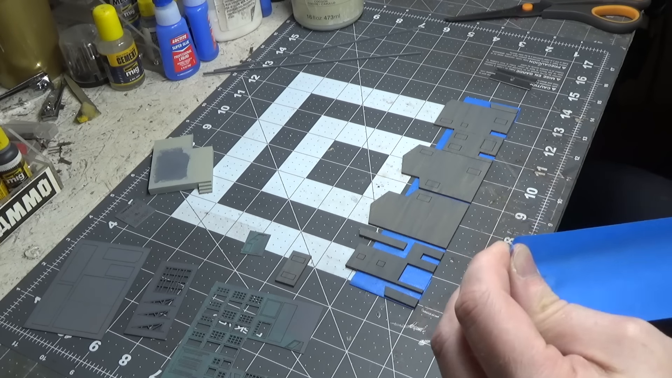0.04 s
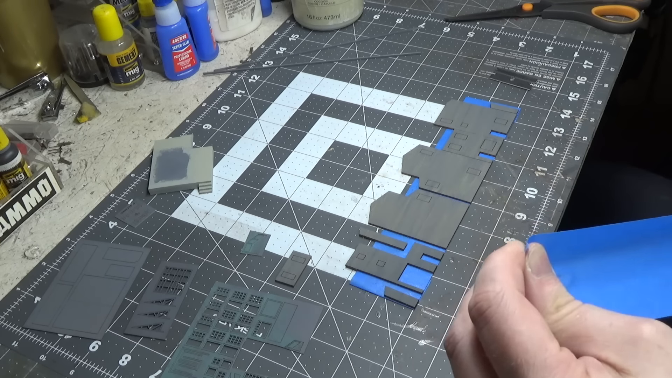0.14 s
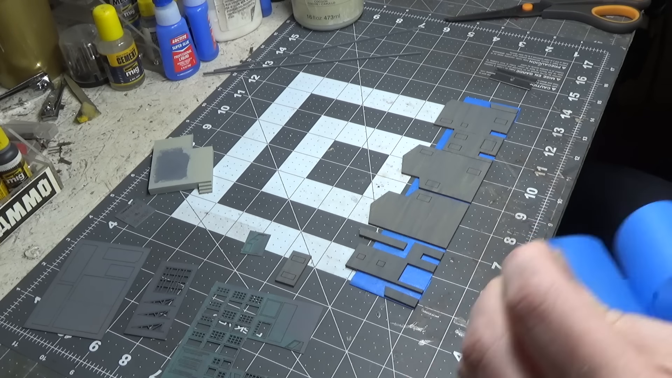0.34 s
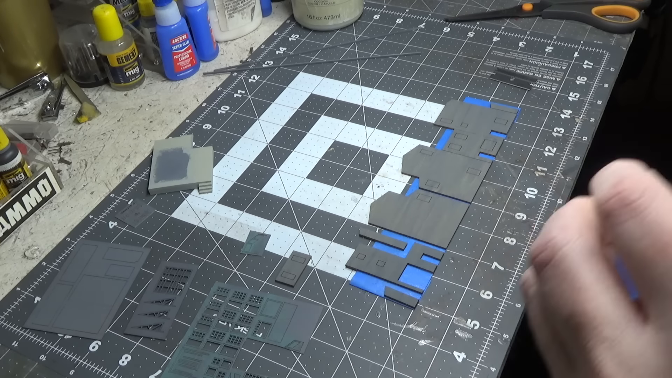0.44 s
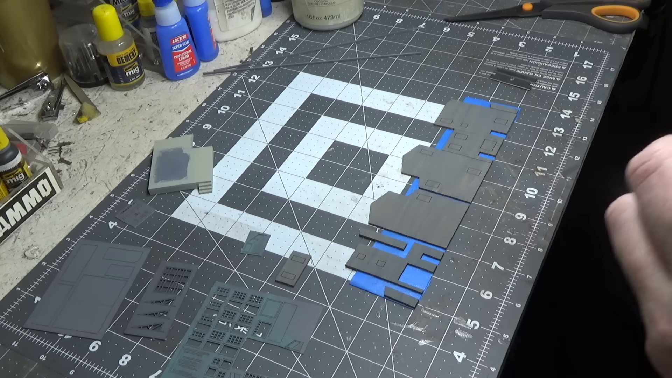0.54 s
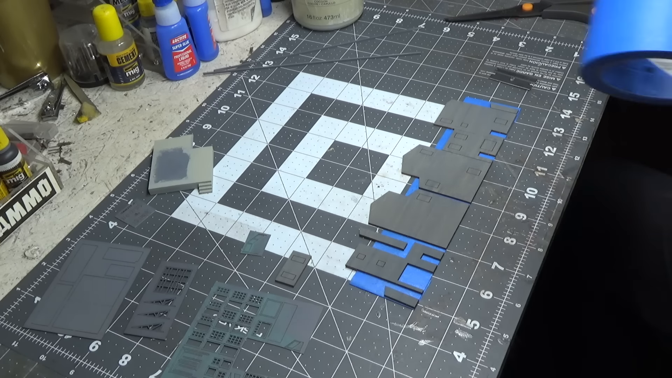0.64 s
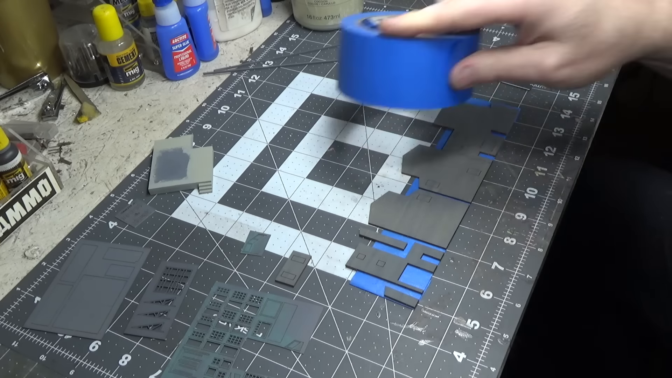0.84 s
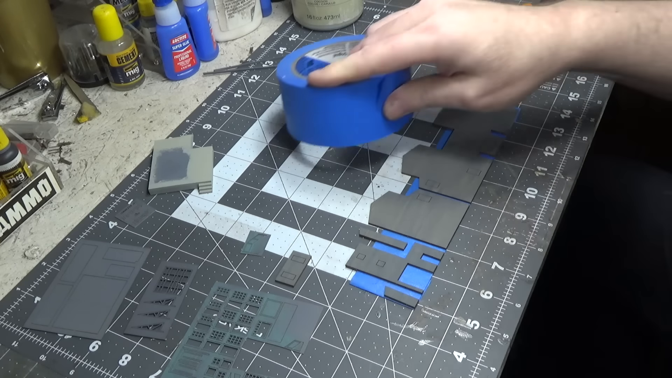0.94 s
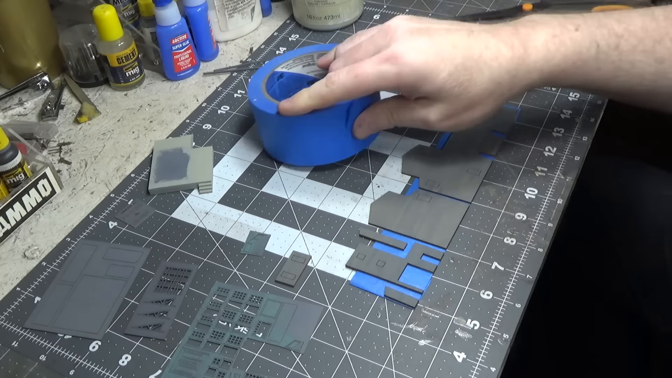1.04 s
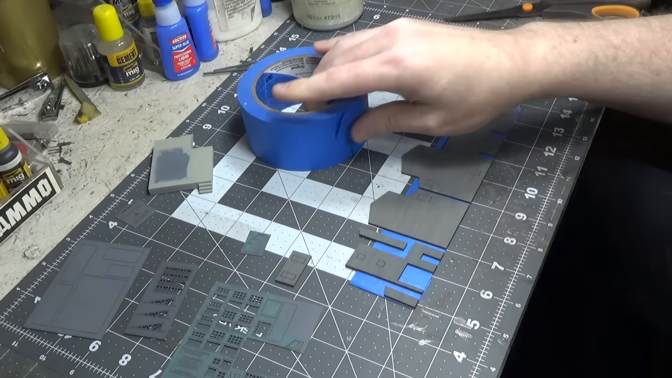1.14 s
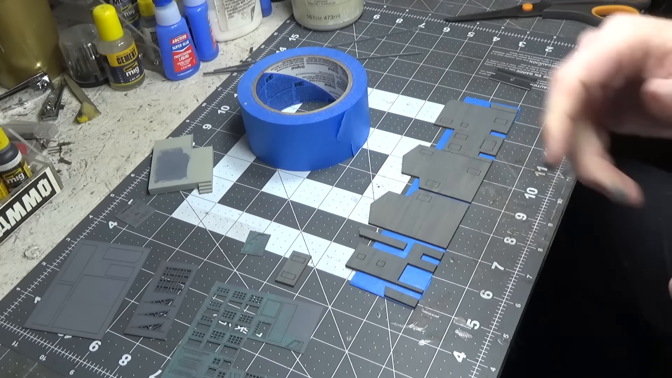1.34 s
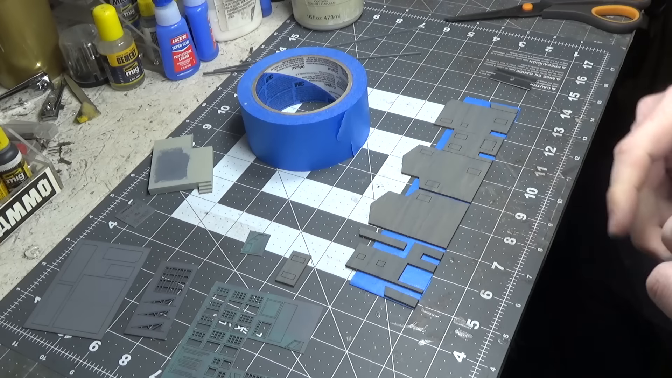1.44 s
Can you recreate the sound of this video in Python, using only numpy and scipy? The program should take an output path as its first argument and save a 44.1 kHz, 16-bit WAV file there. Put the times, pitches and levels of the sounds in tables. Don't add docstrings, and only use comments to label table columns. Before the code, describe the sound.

Masking tape tears off its roll in harsh quick jerks, then the roll thuds on a desk

```python
import sys
import numpy as np
from scipy import signal
from scipy.fft import rfft, irfft
from scipy.io import wavfile
from scipy.ndimage import uniform_filter1d

SR = 44100
rng = np.random.default_rng(int(sys.argv[2]) if len(sys.argv) > 2 else 0)


def invert_db(level):
    return 10 ** (np.asarray(level, dtype=float) / 20)


def master(y):
    cut = np.clip(np.atleast_2d(y).T, -1, 1)
    pcm = np.round(cut * 32767)
    wavfile.write(sys.argv[1], SR, pcm.astype(np.int16))


N = 66150
TIME_S = np.arange(N) / SR

# (frequency [Hz], density [dB per Hz])
HUSH_SPECTRUM = [(20, -18), (60, 4), (100, -5.5), (250, -3), (1000, -14), (2000, -19), (3200, -18),
                 (4200, -21.5), (16000, -27.5)]
HUSH_DB = -61

# (time [s], length [s], first level [dB], last level [dB], tilt [dB per octave])
RUBS = [ (0, .006, -56, -59, -2), (.012, .005, -56, -48, -14), (.0175, .016, -37, -49, -12),
        (.04, .01, -49, -55, -13), (.067, .008, -54, -60, -14), (.4835, .031, -41, -43, 0),
        (.425, .055, -53, -57, -3), (0.514, 0.04, -46.5, -33, 2), (.552, 0.0071, -31, -39.5, -3),
        (.56, 0.036, -55, -51, -1.5), (.597, .009, -50, -47, 1), (.606, .04, -44, -44.5, 1),
        (.646, .044, -45, -48, 0), (.692, .018, -51, -58, -2), (.712, .016, -59, -52, -1),
        (.729, .031, -49, -53, -1), (.411, .012, -40, -48, 3), (0.784, 0.086, -61, -57, -1),
        (0.875, .09, -65, -54.5, -3), (1.093, 0.027, -50, -51, -7), (1.081, 0.11, -56.5, -57, -15.5),
        (1.15, .03, -59.5, -56, -1.5), (1.198, .1, -41, -62.5, -17.5), (1.203, 0.017, -55, -53, 15),
        (.4062, .006, -34, -43, -4)]
# (frequency [Hz], density [dB per Hz])
SKIN_SPECTRUM = [(500, -19), (800, -13.5), (1300, -16.5), (2000, -7), (3000, -2), (6000, -5.5),
                 (10000, -10), (16000, -17)]
RUB_SLIPS_PER_S, RUB_SPREAD_DB, RUB_PATCH_DB = 25000, 1.5, 1
RUB_RISE_S, RUB_RELEASE_T60_S = 0.002, 0.015

# (time [s], level [dB],
# frequency [Hz], t60 [s])
JOLTS = [(0.0177, -57.5, 241.5, 0.21), (0.0183, -31, 456, 0.028), (0.039, -42, 664, 0.024),
         (0.067, -42.5, 384, 0.037), (0.07, -53.5, 69, 0.13), (0.22, -21, 97, 0.13),
         (0.2299, -12.5, 140, 0.073), (0.236, -16, 83, 0.077), (.236, -16, 447.3, 0.062),
         (.236, -11, 226, 0.018), (.253, -42, 600, 0.02), (0.328, -36.5, 328, 0.012),
         (.364, -24.5, 950, 0.008), (0.36, -45, 48, 0.1), (0.407, -50.5, 236, 0.1), (0.414, -47, 38, 0.25),
         (1.095, -50, 537, 0.16), (1.1, -53, 765, 0.12), (.012, -52, 397, 0.035),
         (1.0393, -24, 336, 0.0059), (1.174, -33, 257.6, 0.015), (1.251, -54, 74.5, 1.32),
         (1.258, -58, 138, 0.97), (.0172, -38.5, 4690, 0.022), (.0172, -46.5, 6260, .01),
         (.024, -54, 5200, 0.037), (.0205, -38.5, 3507, .015), (.0215, -39, 283, 0.034),
         (.0413, -40, 648.5, .012), (1.0405, -24, 2430, 0.01), (1.0407, -32.5, 3260, 0.021),
         (1.177, -28, 1220, 0.024), (1.195, -29.5, 200.3, .1)]

# (time [s], peak [dB], centre [Hz], width [Hz])
TICKS = [(0.0175, -35.5, 2780, 1800), (.041, -39, 700, 870), (.068, -40.5, 700, 890),
         (.329, -28, 3100, 1200), (.3641, -31, 2900, 1500), (.0172, -36, 5030, 1800),
         (0.0199, -35, 1340, 1013), (.691, -49, 8400, 5000), (.729, -43, 9400, 2000),
         (.7605, -54, 11000, 2990), (1.1865, -26, 3030, 1195), (1.0931, -43, 2525, 900),
         (.4068, -27, 2900, 2000), (.4097, -22, 9000, 7000), (0.419, -40, 2800, 1500),
         (.5555, -29, 2930, 900), (.691, -40, 700, 1000), (.728, -32.5, 1860, 2070), (.7515, -38, 560, 700),
         (0.7892, -44.5, 8100, 9000), (.907, -52, 2100, 400), (0.9077, -46, 9186, 3870),
         (0.929, -40, 8880, 5000), (0.9563, -36, 7350, 5910), (1.033, -56, 9850, 2910),
         (1.0415, -33, 2668, 900), (1.285, -55, 8990, 2986), (1.307, -51, 7050, 3020),
         (1.355, -54.5, 8980, 2940), (.2317, -8, 8400, 1300), (.2334, -10, 5300, 1400),
         (.2356, -11, 3200, 1500), (0.2233, -13, 2730, 1500), (0.2516, -3, 8970, 2500),
         (.812, -58, 9300, 2000), (0.843, -56, 9460, 1980), (.87, -49, 9000, 2980),
         (.4085, -29, 2450, 1400)]
TICK_T60_S, TICK_RISE_S = 0.0066, 0.000043

# (time [s], level [dB], push +1 or pull -1)
TAPS = [
    (.0179, -19.5, -1),
    (.3281, -15.5, -1),
    (.3639, -13, 1),
]

# (time [s], rise [s], hold [s], level [dB], tilt [dB per octave])
JERKS = [(0.185, .004, 0.013, -50, -3), (0.203, 0.0033, 0.0025, -41, -3), (0.214, 0.0006, .003, -31, -3),
         (.2170, .0006, 0.00076, -16, 0), (0.2180, .0005, 0.001, -8, -1.5),
         (0.219, 0.0025, 0.011, -15, -1.5), (.2295, .002, .001, -14, -2), (.2312, .001, .0013, -14, 2),
         (.2335, .0008, .002, -15, 0), (.2358, .0006, .0012, -16, -2), (0.239, 0.00091, 0.0044, -18, -5.5),
         (.2514, .0007, .0016, -3, 6), (.2541, .0008, .0014, -4, -1), (0.257, .002, 0.0036, -26, -2),
         (0.267, 0.00026, 0.0008, -15.5, -6)]
# (frequency [Hz], density [dB per Hz])
TEAR_SPECTRUM = [(150, -20.5), (400, -9), (1000, -5), (1500, -10.5), (3000, -2.5), (6000, -5.5),
                 (9500, -13), (11500, -17), (16000, -27)]
TEAR_FIBRES_PER_S, TEAR_SPREAD_DB, JERK_T60_S = 25000, 2, 0.0082

# (time [s], length [s], level [dB], frequency [Hz])
SQUEAKS = [
    (.645, .035, -57, 1850),
    (.79, .13, -70, 2090),
    (.897, .02, -62, 1790),
]
SQUEAK_WIDTH_HZ = 250

# (time [s], desk level [dB], crack level [dB], sway level [dB])
LANDINGS = [
    (1.039, -28, -32, -38.5),
    (1.1755, -14, -12, -30),
]
# (frequency [Hz], edge-first level [dB], flat level [dB], t60 [s])
DESK_MODES = [(60.5, -6, -36, 0.029), (90.8, 0.5, -0.5, 0.073), (140, -5.5, -3.5, 0.13),
              (177.6, -27, -3.5, 0.091), (286.7, -11.5, -8.5, 0.076), (407, -15.5, 5.5, 0.029),
              (501, -23.5, -18, 0.18), (566, -23, -21, 0.15), (700, 2, -43, 0.019),
              (912, -17, -10.5, 0.039), (1092, -6, -4.5, 0.016), (1500, -38, -13.5, 0.032)]
# (frequency [Hz], density [dB per Hz])
MAT_SPECTRUM = [(300, -23), (600, -8.5), (1300, -6.5), (1700, -7.5), (2300, -2.5), (3400, -3.5),
                (3900, -16), (16000, -41.5)]
DESK_LAG_S, LAND_RISE_S = 0.00167, 0.01
CRACK_T60_S, CRACK_TAIL_T60_S, CRACK_TAIL_DB = 0.017, 0.089, -14
SWAY_HZ, SWAY_T60_S, BEAT_HZ, BEAT_NULL_S = 38, 8.95, 6.6, 0.04

# (frequency [Hz], t60 [s])
WALLS = [(100, 0.61), (1000, 0.24), (3000, 0.51), (5600, 0.4), (7300, .26), (10000, 0.36), (12000, 0.2),
         (16000, 0.24)]
WALLS_DB, EARLY_DB = -23.5, -10.5
EARLY_SHARE = 0.32
DIFFUSE_HZ = 1200

# (frequency [Hz], gain [dB])
MIC_RESPONSE = [(2200, 0.5), (3300, 1.5), (4100, -4.5), (5400, 1.5), (6700, -1.5), (8600, 2.5), (10300, 0),
                (11200, -2)]
LOW_CUT_HZ, TOP_HZ = 24, 15900
OVERLOAD_PEAK, SPLATTER_DB = 0.94, -34


def unit(x):
    return x / np.sqrt(np.mean(x ** 2) + 1e-20)


def along(points, hz):
    f, v = np.transpose(points)
    return np.interp(np.log(hz + 1), np.log(f + 1), v)


def coloured(x, points, tilt_db=0):
    hz = np.fft.rfftfreq(2048, 1 / SR)
    level_db = along(points, hz) + tilt_db * np.log2((hz + 900) / 3900)
    cepstrum = irfft(np.log(invert_db(level_db) + 1e-6))
    cepstrum[1:1024] *= 2
    cepstrum[1025:] = 0
    h = irfft(np.exp(rfft(cepstrum)))
    return signal.fftconvolve(x, h / np.linalg.norm(h))[:len(x)]


def resonance(x, hz, width_hz):
    size = 2 * len(x)
    f = np.fft.rfftfreq(size, 1 / SR)
    damping = 1j * f * width_hz
    response = damping / (hz * hz - f * f + damping)
    return irfft(rfft(x, size) * response)[:len(x)]


def decay(t, t60):
    return (t >= 0) * invert_db(-60 * np.maximum(t, 0) / t60)


def swell(t, rise, hold, t60):
    return np.clip(t / rise, 0, 1) ** 2 * invert_db(-60 * np.maximum(t - hold, 0) / t60)


def fibres(rate, spread_db):
    happens, polarity, size = rng.random((3, N))
    spread = invert_db(-spread_db * np.log(size + 1e-9))
    return unit((happens < rate / SR) * (polarity - 0.5) * spread)


def patches(depth_db):
    drift = uniform_filter1d(uniform_filter1d(rng.standard_normal(N), 500), 500)
    return invert_db(depth_db * unit(drift))


def stroke(s, length):
    return swell(TIME_S - s, RUB_RISE_S, length, RUB_RELEASE_T60_S)


def hush():
    return invert_db(HUSH_DB) * coloured(rng.standard_normal(N), HUSH_SPECTRUM)


def rubs(slips):
    out = np.zeros(N)
    for s, length, first_db, last_db, tilt_db in RUBS:
        level = invert_db(np.interp(TIME_S, [s, s + length], [first_db, last_db]))
        out += coloured(slips * stroke(s, length) * level, SKIN_SPECTRUM, tilt_db)
    return out


def jolts():
    out = np.zeros(N)
    for s, db, hz, t60 in JOLTS:
        t = TIME_S - s
        out += invert_db(db) * decay(t, t60) * np.sin(2 * np.pi * hz * t)
    return out


def ticks():
    t = np.arange(2000) / SR
    out = np.zeros(N + len(t))
    shape = decay(t, TICK_T60_S) * np.minimum(t / TICK_RISE_S, 1)
    for s, db, hz, width_hz in TICKS:
        click = rng.standard_normal(len(t)) * shape
        for band_hz in (width_hz, width_hz, 2 * width_hz):
            click = resonance(click, hz, band_hz)
        out[round(s * SR):][:len(t)] += invert_db(db) * click / np.abs(click).max()
    return out[:N]


def taps():
    blows = np.zeros(N)
    for s, db, way in TAPS:
        blows[round(s * SR)] = np.sign(way) * invert_db(db)
    return coloured(blows, MAT_SPECTRUM, tilt_db=-6)


def tear():
    slips = fibres(TEAR_FIBRES_PER_S, TEAR_SPREAD_DB)
    out = np.zeros(N)
    for s, rise, hold, db, tilt_db in JERKS:
        shape = swell(TIME_S - s, rise, rise + hold, JERK_T60_S)
        out += invert_db(db) * coloured(slips * shape, TEAR_SPECTRUM, tilt_db)
    return out


def squeaks(slips):
    out = np.zeros(N)
    for s, length, db, hz in SQUEAKS:
        out += invert_db(db) * stroke(s, length) * unit(resonance(slips, hz, SQUEAK_WIDTH_HZ))
    return out


def desk_ring(t, landing):
    u = t - DESK_LAG_S
    out = np.zeros(N)
    for hz, *mode_db, t60 in DESK_MODES:
        shape = decay(u, t60) * (1 - decay(u, LAND_RISE_S))
        out -= invert_db(mode_db[landing]) * shape * np.sin(2 * np.pi * hz * u)
    return out


def mat_crack(t):
    fall = decay(t, CRACK_T60_S) + invert_db(CRACK_TAIL_DB) * decay(t, CRACK_TAIL_T60_S)
    shape = fall * (1 - decay(t, LAND_RISE_S)) ** 2
    return coloured(rng.standard_normal(N) * shape, MAT_SPECTRUM)


def desk_sway(t):
    beat = np.sin(np.pi * BEAT_HZ * (t - BEAT_NULL_S))
    return decay(t, SWAY_T60_S) * beat * np.sin(2 * np.pi * SWAY_HZ * t)


def landings():
    air, sway = np.zeros(N), np.zeros(N)
    for k, (s, desk_db, crack_db, sway_db) in enumerate(LANDINGS):
        t = TIME_S - s
        air += invert_db(desk_db) * desk_ring(t, k) + invert_db(crack_db) * mat_crack(t)
        sway += invert_db(sway_db) * desk_sway(t)
    return air, sway


def band_fall(t, hz, share):
    return invert_db(-60 * t / (share * along(WALLS, hz)[:, None]))


def echo(share):
    hz, t, z = signal.stft(rng.standard_normal(SR // 2), SR, nperseg=128)
    tail = signal.istft(z * band_fall(t, hz, share), SR, nperseg=128)[1]
    return tail / np.linalg.norm(tail)


def diffuse(x):
    source = np.pad(x, (128, 0))[:N]
    hz, t, z = signal.stft(np.array([source, rng.standard_normal(N)]), SR, nperseg=128)
    power = uniform_filter1d(np.abs(z[0]) ** 2, size=5, axis=0)
    power *= (hz > DIFFUSE_HZ)[:, None]
    fall = 0
    for db, share in ((WALLS_DB, 1), (EARLY_DB, EARLY_SHARE)):
        energy = band_fall(t, hz, share) ** 2
        fall = fall + invert_db(2 * db) * energy / energy.sum(1, keepdims=True)
    wet = np.abs(signal.fftconvolve(power, fall, axes=1)[:, :len(t)])
    noise = z[1] / np.sqrt(np.mean(np.abs(z[1]) ** 2))
    return signal.istft(np.sqrt(wet) * noise, SR, nperseg=128)[1][:N]


def room(x):
    band = signal.butter(2, [75, DIFFUSE_HZ], "band", fs=SR, output="sos")
    low = signal.sosfilt(band, np.pad(x, (90, 0)))
    tails = invert_db(WALLS_DB) * echo(0.98) + invert_db(EARLY_DB) * echo(EARLY_SHARE)
    return signal.fftconvolve(low, tails)[:N] + diffuse(x)


def scene():
    slips = fibres(RUB_SLIPS_PER_S, RUB_SPREAD_DB) * patches(RUB_PATCH_DB)
    air, sway = landings()
    near = rubs(slips) + jolts() + ticks() + taps() + tear() + squeaks(slips) + air
    return (coloured(near + room(near), MIC_RESPONSE) + sway + hush())[None]


def top_cut(x):
    return signal.sosfilt(signal.butter(12, 21850, fs=SR, output="sos"), x)


def record(dry):
    taps = signal.firwin(151, TOP_HZ, fs=SR)[None]
    limited = signal.fftconvolve(dry, taps, "same")
    hot = np.clip(limited, -OVERLOAD_PEAK, OVERLOAD_PEAK)
    kept = signal.fftconvolve(hot, taps, "same")
    splatter = invert_db(SPLATTER_DB) * (hot - kept)
    low_cut = signal.butter(2, LOW_CUT_HZ, "high", fs=SR, output="sos")
    mix = np.clip(signal.sosfilt(low_cut, kept + splatter), -1, 1)
    return top_cut(mix)


dry = scene()
out = record(dry)
master(out)
```